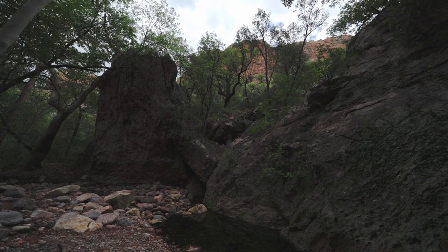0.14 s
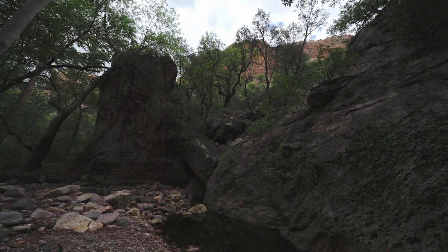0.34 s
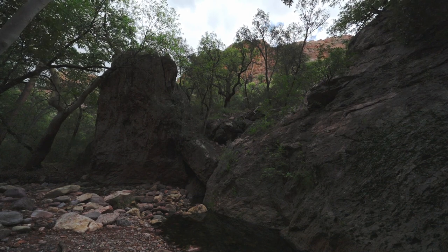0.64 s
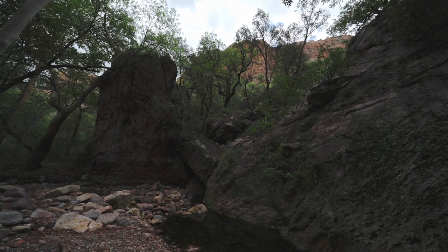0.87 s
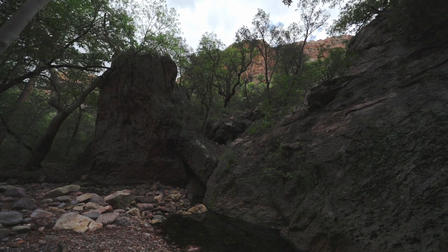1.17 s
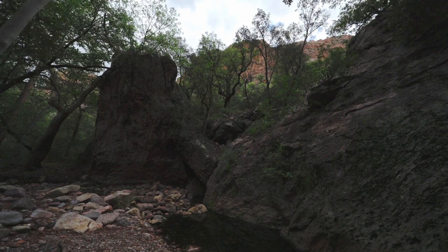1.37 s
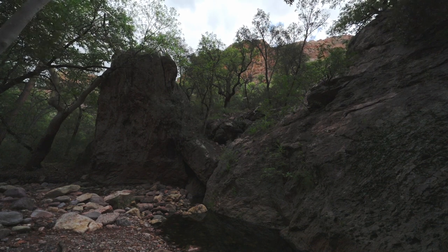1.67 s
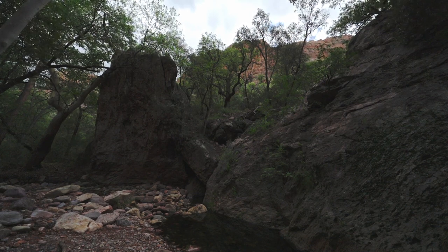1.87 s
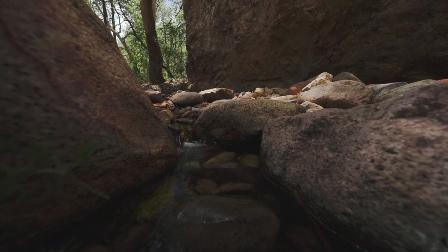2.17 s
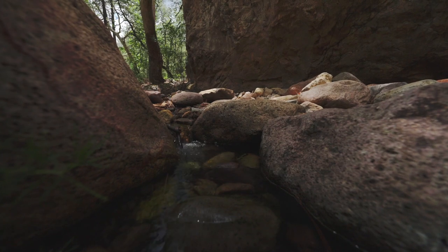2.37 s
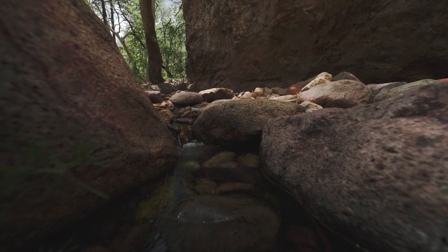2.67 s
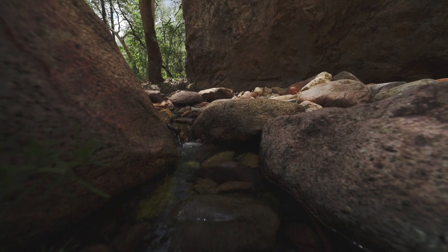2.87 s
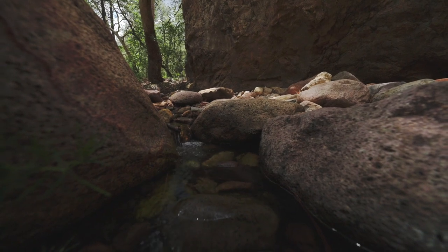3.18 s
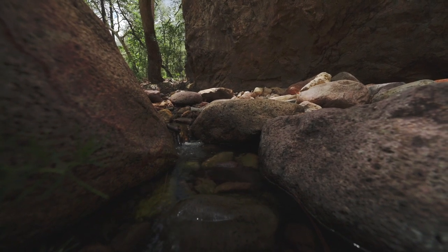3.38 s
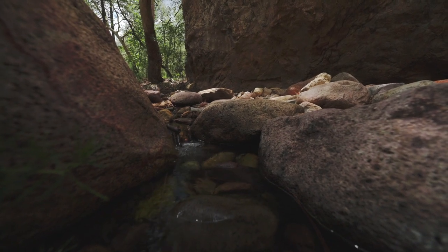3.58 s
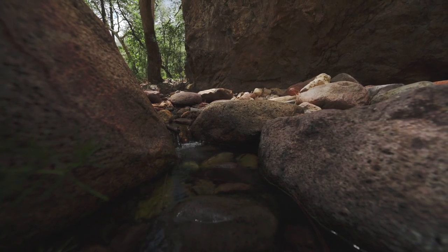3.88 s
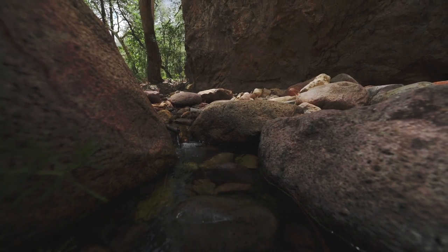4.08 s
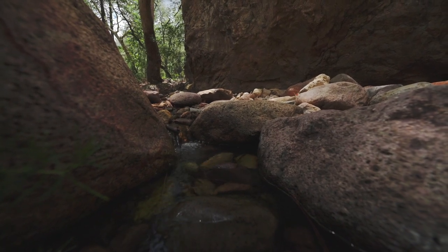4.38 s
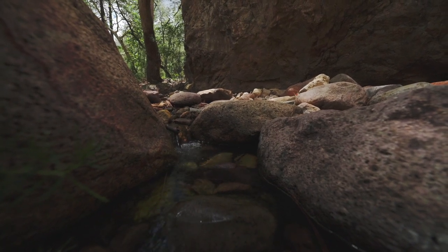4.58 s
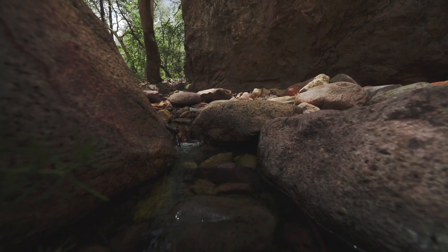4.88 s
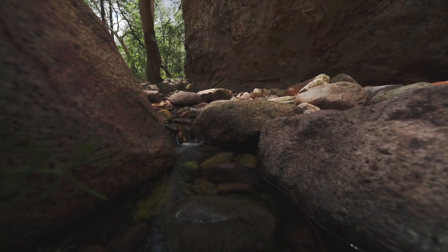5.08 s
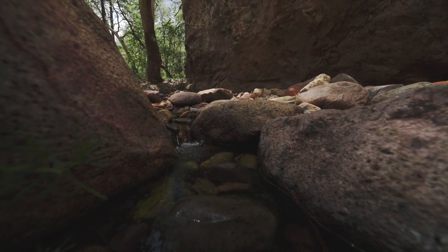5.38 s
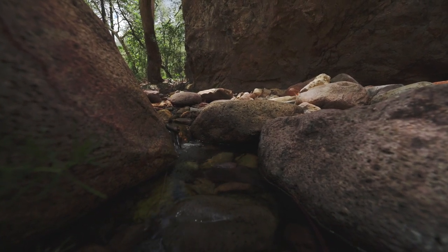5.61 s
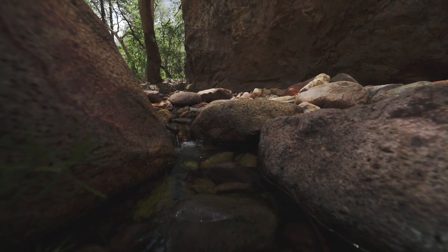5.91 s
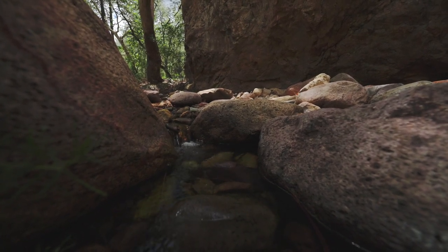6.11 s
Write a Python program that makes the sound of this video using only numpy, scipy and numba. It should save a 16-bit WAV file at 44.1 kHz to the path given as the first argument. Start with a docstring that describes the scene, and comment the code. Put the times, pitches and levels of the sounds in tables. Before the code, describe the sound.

First a quiet, blurred stream heard from afar, with a light low breath of wind and two short stone clacks within the first second. Then, with an abrupt cut and a tiny tap just before it, the microphone is right beside a small spill between rocks. Water bubbles and plops irregularly, bright around the middle pitches, with deeper glugs, crisp droplets and brief falters, closely coloured by the stone cavity.

```python
"""Water spilling into a crevice beside the listener, after a first part in which the creek is far off.
Resonant bubbles, glugging air pockets and bursting droplets ring as decaying sines; spray is enveloped noise.
The cavity between the rocks colours the near water by its resonances, and stone returns dull echoes.
The opening has a few pebble knocks, as struck modes, over the distant creek, as filtered noise with
faint bubbles, and light wind, as low band noise."""
import sys
import numpy as np
from scipy import signal
from scipy.fft import rfft, irfft
from scipy.io import wavfile
from numba import njit

SR = 44100
rng = np.random.default_rng(int(sys.argv[2]) if len(sys.argv) > 2 else 0)


def store_wav(level_fs):
    """Save 16-bit WAV to argv[1]."""
    pcm = np.round(np.clip(np.atleast_2d(level_fs), -1, 1) * 32767)
    wavfile.write(sys.argv[1], SR, pcm.T.astype(np.int16))


N = 275625

NEAR_S = 2.077   # the listening point jumps to the water's edge
CUTOFF_HZ = 15900   # upper limit of the sound

# steady spill at the crevice, between its flurries: (time [s], gurgle level [dB], spray level [dB])
SPILL_FLOW = [(2.08, -36, -47), (2.25, -32.5, -46), (2.45, -32, -45), (2.79, -32.5, -47),
              (3.17, -31.5, -43.5), (3.46, -32.5, -45), (3.59, -32.5, -45.5), (4.04, -32.5, -44.5),
              (4.3, -32.5, -47.5), (4.63, -32.5, -45), (5.13, -32.5, -45), (5.51, -33, -44),
              (5.7, -32.5, -45), (5.84, -31.5, -41.5), (6.07, -31, -44.5), (6.25, -32.5, -41)]
# relative spectrum of the near water: (frequency [Hz], level [dB per Hz])
NEAR_SPECTRUM = [(15, -99), (25, -37), (64, -45.5), (223, -18.5), (714, -4.5), (1020, -6.5), (1610, 2),
                 (4250, -19.5), (4610, -25), (5280, -21), (6560, -38), (9070, -39), (16000, -49)]
# air resonances between the rocks: (frequency [Hz], width [Hz], lift [dB])
CREVICE_RESONANCES = [(233, 70, 11), (464, 153, 9), (734, 124, 5), (1520, 260, 6.5), (2061, 113, 8),
                      (4226, 240, 7.5), (5250, 1300, 4.5), (9300, 4700, 18.5), (13100, 2600, 15.5),
                      (15400, 2000, 16)]
# moments when the spill falters: (middle time [s], length at half depth [s])
LULLS = [(2.445, 0.033), (2.641, 0.035), (2.93, 0.05), (3.459, 0.017), (4.202, 0.027), (4.29, 0.029),
         (4.937, 0.019), (5.1, 0.02), (5.25, 0.032), (5.95, 0.098), (6.06, 0.038)]
LULL_DB = -5   # on the gurgle; the spray takes 0.4 of it
# splashes that build up and break over the whole band: (middle time [s], peak level [dB], length [s])
SPLASHES = [(3.226, -20.5, 0.016), (3.779, -16, 0.015), (6.003, -27, 0.012)]
# brightening of the splashes over the spill: (frequency [Hz], lift [dB])
SPLASH_LIFT = [(300, 12), (2500, 1.5), (6000, 14), (16000, 3)]
# loudest tiny bubbles of the spray: (time [s], peak level [dB], pitch [Hz])
SPRAY_TICKS = [(2.2695, -27, 9900), (2.3105, -30.5, 8790), (2.5743, -28, 9400), (2.7373, -32, 8900),
               (3.2837, -29, 9930), (3.6453, -25, 9860), (3.778, -29, 8740), (4.3174, -31, 8960),
               (4.4086, -28, 13100), (4.5817, -27.5, 9980), (4.8177, -29, 14200), (5.114, -21.5, 9310),
               (5.35, -32, 9470), (5.4915, -26, 9880), (5.6564, -26, 9900)]
# loud bubbles: (time [s], peak level [dB], pitch [Hz], life [cycles])
LOUD_BUBBLES = [(2.084, -22, 1570, 17), (2.123, -16.5, 1520, 15), (2.1398, -17.5, 1520, 26),
                (2.1675, -21, 1580, 26), (2.2225, -20.5, 1470, 15), (2.304, -19, 1600, 10),
                (2.313, -22, 1200, 9.3), (2.3841, -18.5, 1470, 22), (2.411, -21, 1350, 18),
                (2.461, -10, 1535, 24), (2.507, -19, 1380, 26), (2.569, -19, 1320, 8.5),
                (2.7406, -13, 1600, 8.1), (2.958, -16.5, 1390, 140), (2.9902, -17, 1430, 40),
                (3.009, -18, 2070, 18), (3.0103, -12, 1596, 34), (3.077, -18, 1450, 18),
                (3.143, -11, 1700, 7.9), (3.2178, -18.5, 1430, 12), (3.295, -18, 1500, 29),
                (3.318, -17, 1480, 23), (3.343, -13, 1700, 32), (3.404, -15, 1570, 6),
                (3.4725, -15, 1650, 14), (3.478, -14, 2040, 18), (3.504, -17, 1520, 20),
                (3.536, -21, 1550, 17), (3.6768, -16.5, 1590, 35), (3.819, -17, 1660, 10),
                (3.867, -17, 1550, 29), (3.9222, -18, 1580, 28), (4.049, -20, 1520, 23),
                (4.074, -18.5, 1970, 30), (4.1463, -12.5, 1520, 12), (4.2383, -17, 1490, 28),
                (4.31, -23, 1100, 18), (4.3755, -15, 2114, 37), (4.518, -16.5, 1510, 21),
                (4.8146, -23, 1360, 23), (4.8645, -19, 1960, 19), (5.006, -19, 1560, 14),
                (5.018, -25, 1210, 25), (5.041, -11, 1660, 13), (5.112, -18, 1480, 16),
                (5.2042, -19, 1350, 12), (5.2075, -7.5, 1960, 21), (5.2092, -8, 1700, 25),
                (5.23, -17, 2060, 16), (5.244, -16, 1660, 18), (5.319, -16, 1540, 11),
                (5.411, -13.5, 1590, 10), (5.523, -16, 1665, 67), (5.5295, -12.5, 1640, 25),
                (5.5847, -20, 1400, 24), (5.6245, -19, 1600, 22), (5.671, -21, 1600, 23),
                (5.734, -21, 1510, 21), (5.893, -13, 1520, 16), (5.911, -26, 1560, 20),
                (5.967, -26, 2050, 30), (5.991, -27, 1360, 30), (5.9985, -14, 1530, 12),
                (6.025, -18, 2220, 26), (6.0307, -16, 1580, 19), (6.047, -28, 2080, 28),
                (6.237, -14.5, 1510, 11)]
# air pockets closing: (time [s], peak level [dB], pitch [Hz], life [cycles], thump level [dB])
GLUGS = [(2.089, -34, 392, 9.4, -38), (2.139, -32, 670, 53, -50), (2.234, -28, 498, 130, -51),
         (2.288, -23.5, 450, 22, -57), (2.356, -28, 727, 37, -51), (2.421, -29, 770, 16, -62),
         (2.5, -29, 512, 40, -49), (2.54, -31, 705, 25, -58), (2.569, -23.5, 460, 27, -54),
         (2.664, -31, 497, 20, -44), (2.697, -25, 510, 52, -55), (2.739, -25, 590, 30, -49),
         (2.74, -28, 405, 43, -55), (2.84, -27, 640, 20, -54), (2.982, -31, 725, 28, -61),
         (3.143, -28, 488, 35, -53), (3.2258, -21.5, 475, 26, -43), (3.416, -20, 720, 25, -59),
         (3.63, -22, 486, 15, -36), (3.683, -28.5, 420, 25, -56), (3.7757, -24.5, 498, 51, -46),
         (4.143, -46, 678, 28, -44), (4.24, -21.5, 754, 31, -67), (4.318, -31, 468, 29, -42.5),
         (4.445, -23.5, 480, 25, -43.5), (4.813, -26, 503, 25, -43.5), (4.884, -24, 746, 21, -45.5),
         (5.012, -32.5, 670, 34, -58), (5.045, -28, 648, 36, -41), (5.207, -29, 688, 34, -48),
         (5.394, -23, 722, 30, -49), (5.504, -30.5, 764, 49, -43), (5.565, -20.5, 707, 8.1, -48),
         (5.67, -24, 720, 19, -47), (5.754, -21, 706, 20, -45), (5.894, -25.5, 415, 18, -39.5),
         (5.998, -21, 715, 17, -35), (6.122, -26, 474, 17, -39), (6.186, -34, 674, 11, -46),
         (6.237, -24, 716, 29, -43)]
# droplets bursting: (time [s], peak level [dB], pitch [Hz])
DROPLETS = [(2.1316, -28, 5250), (3.015, -26, 2880), (3.2223, -27.5, 3670), (3.479, -26.5, 3260),
            (3.5137, -25.5, 2770), (3.7785, -22, 5100), (4.0434, -26.5, 3820), (4.151, -29, 3050),
            (4.2407, -26.5, 5200), (4.3362, -27, 2930), (4.578, -27, 5300), (4.896, -22.5, 4160),
            (5.1139, -25, 5600), (5.208, -25, 5250), (5.785, -28.5, 3530)]
# modes of the air under the rocks: (frequency [Hz], level against the thump [dB], 60 dB decay time [s])
HOLLOW_MODES = [(237.6, 7.5, 0.07), (325, 7, 0.041), (700, -1, 0.13)]
HOLLOW_SPREAD = 0.083   # log pitch spread: the water level shifts it from glug to glug
# echoes off the near rocks: (delay [s], level [dB])
ROCK_ECHOES = [(.0031, -11.5), (0.009, -16)]
FLURRY_RISE_S, FLURRY_FALL_S = 0.0012, 0.016   # power rise and amplitude fall time constants
GURGLE_FLURRY_DB, SPRAY_FLURRY_DB = -23, -14   # flurry level against the peak of its burst
POP_DB, POP_MS = -16, 0.78   # birth pop: strike level against the bubble's peak; decay time
SPATTER_SWELL = 0.85   # swell time of a puff of spray over its decay time
MIST_DB, RUMBLE_DB = -60.5, -70.5   # rms levels
# pebble knocks: (time [s], peak level [dB], lift above 2800 Hz [dB], pitch ratio of the 1200-2800 Hz modes,
# contact length [ms], snap level [dB], lift below 1200 Hz [dB], share of the ring time)
PEBBLE_KNOCKS = [(.349, -18, 4.5, 0.87, 4.4, -23, -4, 1), (0.557, -7.5, 3, 0.95, 4.2, -13, -2.5, 0.67),
                 (2.046, -25.5, -20, 1, 1.5, -33, 5, 0.32)]
# modes of the pebble: (frequency [Hz], level against the knock [dB], 60 dB decay time [s])
PEBBLE_MODES = [(570, -7, 0.018), (954, -6.5, 0.017), (1888, 1, 0.026), (2270, -17.5, 0.094),
                (3240, -18.5, 0.018), (3780, -17, 0.013), (4560, -22.5, 0.0053), (8560, -43, 0.0022),
                (12400, -31, 0.0039)]
# colour of the contact snap: (frequency [Hz], level [dB per Hz])
SNAP_SPECTRUM = [(400, -0.5), (2000, 3), (5300, -6.5), (6700, -13), (9500, -18), (16000, -22)]
SNAP_PEAK_MS = 1.7   # time at which the envelope of the dry snap peaks
# echoes of the knocks off the ground: (delay [s], level [dB])
GROUND_ECHOES = [(.0105, -10.5), (.0145, -18), (.021, -27), (.052, -32)]
# distant creek: (time [s], water level [dB], wind level [dB])
FAR_LEVELS = [(0, -45, -75), (.3, -47, -69), (.45, -45.5, -59), (.6, -45.5, -66), (.8, -46, -64),
              (.86, -45, -56), (1.0, -45.5, -63), (1.25, -46, -59.5), (1.45, -45.5, -64), (1.75, -44, -57),
              (1.93, -45.5, -53), (2.07, -43.5, -71)]
# relative spectrum of the distant water: (frequency [Hz], level [dB per Hz])
FAR_SPECTRUM = [(53, -40), (90, -9), (180, -6.5), (480, 1), (650, 1), (1000, -3.5), (1900, -6), (3000, -9),
                (4300, -8.5), (5300, -9.5), (6700, -26.5), (9500, -19), (11500, -30), (16000, -30)]
# faint bubbles that carry from afar: (time [s], peak level [dB], pitch [Hz])
FAR_PLOPS = [(0.688, -34.5, 1720), (0.753, -38, 1090), (1.393, -36, 1960), (1.448, -36.5, 1790),
             (1.483, -36, 1870), (1.587, -39, 1800), (1.7562, -38, 1890)]


def near_spill():
    """Superposition of bubble swarms and spray, whose surges share one slow modulation."""
    gurgle_db, spray_db = in_time(SPILL_FLOW)
    lull_db = LULL_DB * sum(bump(s, 2 * length_s) for s, length_s in LULLS)
    gurgle_db, spray_db = gurgle_db + lull_db, spray_db + 0.4 * lull_db
    surge = drift(20.0)
    hiss = rng.standard_normal(N) * from_db(1.84 * surge)
    puffs = spray_puffs(surge)

    bubbles = swarm(1400, 147.5, 4213, cycles=18.0, spread_db=3.0, clumps_db=2.2 * surge)
    small_bubbles = swarm(1200, 2433, 9900, cycles=35.0, spread_db=5.5, clumps_db=3.0 * surge)
    fizz = swarm(700, 6200, CUTOFF_HZ, cycles=26.0, spread_db=4.5, clumps_db=3.0 * surge)
    gurgle = bubbles + from_db(2.5) * hiss + from_db(-1.5) * puffs
    splash = small_bubbles + from_db(4.0) * hiss + from_db(3.0) * puffs
    spray = puffs + from_db(-6.0) * fizz

    # each layer keeps its own band of the shared colour
    gurgle = rms_one(band(in_crevice(gurgle), 3, 3200, "low"))
    splash = rms_one(band(in_crevice(splash), 3, [3200, 6600], "band"))
    spray = rms_one(band(in_crevice(spray), 3, 6600, "high"))

    # steady flow and flurries add as powers
    gurgle_gain = np.sqrt(from_db(2 * gurgle_db) + flurries([LOUD_BUBBLES, GLUGS], GURGLE_FLURRY_DB))
    spray_gain = np.sqrt(from_db(2 * spray_db) + flurries([DROPLETS, SPRAY_TICKS], SPRAY_FLURRY_DB))
    ticks = named_bubbles(*np.transpose(SPRAY_TICKS), cycles=21.0, rise=.05, swell=1.8)
    water = gurgle_gain * gurgle + spray_gain * (splash + from_db(-8.0) * spray)
    return water + ticks + splashes() + mist() + rumble()


def spray_puffs(surge):
    """Random impacts: strikes of uneven strength, denser as the flow surges."""
    rate_per_s = 260 * from_db(2.0 * surge + 1.5 * drift(30.0))
    struck = rng.random(N) < rate_per_s / SR
    strength_db = 7.0 * np.minimum(rng.exponential(1, N), 3)
    return rms_one(spatter(struck * from_db(strength_db), decay_ms=2.7))


def in_crevice(x):
    """Cavity resonance: the air between the rocks lifts parts of the water's spectrum."""
    return colour(x, NEAR_SPECTRUM, CREVICE_RESONANCES)


def splashes():
    """Amplitude modulation: smooth swells of broadband noise in a brightened crevice colour."""
    noise = rms_one(colour(in_crevice(rng.standard_normal(N)), SPLASH_LIFT))
    swells = sum(from_db(peak_db) * bump(s, length_s) for s, peak_db, length_s in SPLASHES)
    return noise / 2 * swells   # a peak is taken as twice the rms


def flurries(tables, level_db):
    """Energy addition: the power of the churn stirred up by each burst rises fast and falls slower."""
    power = sum(clicks(rows[0], 2 * (rows[1] + level_db)) for rows in map(np.transpose, tables))
    t = np.arange(SR // 4) / SR
    shape = np.exp(-2 * t / FLURRY_FALL_S) * (1 - np.exp(-t / FLURRY_RISE_S))
    return np.abs(signal.oaconvolve(power, shape / shape.max())[:N])


def bursts():
    """Bubble resonance: the loudest bubbles, glugs and droplets ring, pop, thump and echo off the rocks."""
    bubbles = named_bubbles(*np.transpose(LOUD_BUBBLES), rise=-0.0021, swell=1.35)
    s, peak_db, hz, cycles, _ = np.transpose(GLUGS)
    glugs = named_bubbles(s, peak_db, hz, cycles, rise=0.019, swell=1.0)
    droplets = named_bubbles(*np.transpose(DROPLETS), cycles=43.0, rise=0.13, swell=1.6)
    out = bubbles + glugs + droplets + hollow_thumps() + birth_pops()
    # a high-pass keeps the bursts free of deep bass
    return echoes(band(out, 4, 150, "high"), ROCK_ECHOES, dull_hz=4240)


def hollow_thumps():
    """Cavity excitation: each closing pocket sets the air modes under the rocks ringing."""
    s, _, _, _, thump_db = np.transpose(GLUGS)
    shift = np.exp(HOLLOW_SPREAD * rng.standard_normal(len(s)))
    return sum(named_bubbles(s, thump_db + level_db, mode_hz * shift, mode_hz * t60, 0, swell=0.26)
               for mode_hz, level_db, t60 in HOLLOW_MODES)


def birth_pops():
    """Impulsive excitation: a puff of noise at each loud bubble's birth is coloured by the crevice."""
    s, peak_db, *_ = np.transpose(LOUD_BUBBLES)
    response = in_crevice(np.eye(1, 4000)[0])
    pops = spatter(clicks(s, peak_db + POP_DB), POP_MS)
    return signal.oaconvolve(pops, response / np.linalg.norm(response))[:N]


def named_bubbles(s, peak_db, hz, cycles, rise, swell):
    """Damped oscillation: bubbles at given moments, scaled so that the swell tops out at the peak level."""
    at, same = (s * SR).astype(np.int64), np.ones(len(s))
    ratio = swell * np.log(1000) / cycles   # swell time over decay time
    top = (1 + 1 / ratio) ** -ratio / (1 + ratio)
    size = from_db(peak_db) / top * same
    return add_bubbles(np.zeros(N), at, size, hz / SR * same, cycles * same, rise * same, swell)


def swarm(per_s, low_hz, high_hz, cycles, spread_db, clumps_db, near=True):
    """Random superposition: clumped bubbles, with small ones scaled up so that the spectrum is flat."""
    at = np.flatnonzero(rng.random(N) < per_s * from_db(clumps_db) / SR)
    at = at[(at >= NEAR_S * SR) == near]
    draw = rng.random((len(at), 4))
    hz = low_hz * (high_hz / low_hz) ** draw[:, 0]
    strength_db = spread_db * np.minimum(-np.log(1 - draw[:, 1]), 3.0)
    size = hz * from_db(strength_db) * np.sign(draw[:, 2] - .5)
    life = cycles * (.5 + draw[:, 3])
    return rms_one(add_bubbles(np.zeros(N), at, size, hz / SR, life, 0.13 * draw[:, 3], 3.0))


@njit
def add_bubbles(out, at, size, step, cycles, rise, swell):
    """Damped oscillation: a sine swells within cycles, decays 60 dB over its life and may slide in pitch."""
    for k in range(len(at)):
        phase, dying, unborn = 0.0, size[k], 1.0
        life = cycles[k] / step[k]   # in samples
        loss, growth = 0.001 ** (1 / life), np.exp(-step[k] / swell)
        for i in range(min(int(life), len(out) - at[k])):
            phase += step[k] * (1 + rise[k] * i / life)
            out[at[k] + i] += dying * (1 - unborn) * np.sin(2 * np.pi * phase)
            dying, unborn = dying * loss, unborn * growth
    return out


def spatter(strikes, decay_ms):
    """Impact noise: each strike is a puff that swells briefly and decays exponentially."""
    r = np.exp(-1000 / (decay_ms * SR))
    swell = np.hanning(max(3, round(SPATTER_SWELL * decay_ms * SR / 1000)))
    decays = signal.lfilter([1], [1, -r], strikes + 1e-18)
    return np.convolve(decays, swell / swell.sum())[:N] * rng.standard_normal(N)


def knocks():
    """Modal excitation: a short rough contact snaps and builds up the pebble's modes."""
    out = np.zeros(N)
    for s, peak_db, bright_db, pitch, contact_ms, snap_db, body_db, damped in PEBBLE_KNOCKS:
        at, size = round(s * SR), round(contact_ms * SR / 1000)
        snap = contact_snap()
        out[at:at + len(snap)] += from_db(snap_db) * snap
        for hz, level_db, t60 in PEBBLE_MODES:
            mode_hz = hz * pitch if 1200 < hz < 2800 else hz
            in_step = np.cos(2 * np.pi * (mode_hz * np.arange(size) / SR + rng.random()))
            touch = (in_step + 0.98 * rng.standard_normal(600)[:size]) * np.hanning(size)
            sound = ring(np.pad(touch, (0, 6000)), mode_hz, t60 * damped)
            strength_db = peak_db + level_db + bright_db * (hz > 2800) + body_db * (hz < 1200)
            out[at:at + len(sound)] += from_db(strength_db) * sound / np.max(np.abs(sound))
    # a gentle high-pass thins the bass of the knocks
    out = band(out + 1e-18 * rng.standard_normal(N), 2, 330, "high")
    return echoes(out, GROUND_ECHOES, dull_hz=1510)


def contact_snap():
    """Contact noise: coloured noise under an envelope that rises linearly and decays exponentially."""
    t = np.arange(1000) / SR * 1000 / SNAP_PEAK_MS
    noise = colour(rng.standard_normal(len(t)), SNAP_SPECTRUM)[:len(t)]
    return t * np.exp(1 - t) * noise


def ring(force, hz, t60):
    """Modal resonance: a unit click sets a decaying sine of initial height 1 ringing."""
    r, w = from_db(-60 / (t60 * SR)), 2 * np.pi * hz / SR
    return signal.lfilter([0, np.sin(w)], [1, -2 * r * np.cos(w), r * r], force + 1e-18)


def echoes(x, table, dull_hz):
    """Reflection: delayed copies, dulled by a two-pole low-pass, join the direct sound."""
    r = np.exp(-2 * np.pi * dull_hz / SR)
    dull = signal.lfilter([1], [1, -2 * r, r * r], x + 1e-18) * (1 - r) ** 2
    out = x.copy()
    for delay_s, level_db in table:
        lag = round(delay_s * SR)
        out[lag:] += from_db(level_db) * dull[:-lag]
    return out


def far_creek():
    """Blurring by distance: many bubbles merge into a soft rush, with faint plops and wind."""
    water_db, wind_db = in_time(FAR_LEVELS)
    patter = swarm(990, 243, 9430, cycles=17.0, spread_db=6.0, clumps_db=5.4 * drift(11.0), near=False)
    rush = rng.standard_normal(N) + from_db(-17.5) * patter
    water = rms_one(colour(rush, FAR_SPECTRUM))
    return from_db(water_db) * water + far_plops() + from_db(wind_db) * wind()


def far_plops():
    """Multipath propagation: close dull echoes smear the faint bubbles on the way."""
    plops = named_bubbles(*np.transpose(FAR_PLOPS), cycles=25.0, rise=.1, swell=0.51)
    return echoes(plops, [(.004, -10), (.009, -5), (.016, -6)], dull_hz=5000)   # (delay [s], level [dB])


def wind():
    """Turbulence noise: a low band of noise, buffeting by slow random gain."""
    return rms_one(band(rng.standard_normal(N), 3, [16, 75], "band")) * from_db(2.0 * drift(14.0))


def mist():
    """Stationary noise: a steady high hiss in the crevice's colour."""
    return from_db(MIST_DB) * rms_one(band(in_crevice(rng.standard_normal(N)), 3, 6000, "high"))


def rumble():
    """Stationary noise: the gorge's steady low band."""
    return from_db(RUMBLE_DB) * rms_one(band(rng.standard_normal(N), 2, [75, 170], "band"))


def colour(x, spectrum, peaks=()):
    """Minimum-phase filtering: a causal response from a spectrum and resonance lifts, by the cepstrum."""
    size = 2 ** 13
    hz = np.maximum(np.arange(size // 2 + 1) * SR / size, 10)
    point_hz, point_db = np.transpose(spectrum)
    level_db = np.interp(np.log(hz), np.log(point_hz), point_db)
    for centre_hz, width_hz, lift_db in peaks:
        level_db = level_db + lift_db / (1 + (2 * (hz - centre_hz) / width_hz) ** 2)
    cepstrum = irfft(np.log(from_db(level_db)))
    cepstrum[1:size // 2] *= 2
    cepstrum[size // 2 + 1:] = 0
    return signal.oaconvolve(x, irfft(np.exp(rfft(cepstrum))))[:N]


def band(x, order, edge_hz, kind):
    """Band limitation: a Butterworth filter."""
    return signal.sosfilt(signal.butter(order, edge_hz, kind, fs=SR, output="sos"), x)


def drift(rate_hz):
    """Slow random modulation: noise at every 40th sample, twice through a one-pole low-pass; rms 1."""
    r = np.exp(-80 * np.pi * rate_hz / SR)
    noise = rng.standard_normal(N // 40 + 1002)
    slow = signal.lfilter([1], [1, -2 * r, r * r], noise)[1000:]   # skip the settling
    return np.interp(np.arange(N) / 40, np.arange(len(slow)), rms_one(slow))


def bump(middle_s, length_s):
    """Raised-cosine envelope: a smooth swell from 0 to 1 and back."""
    return np.cos(np.pi * np.clip((np.arange(N) / SR - middle_s) / length_s, -.5, .5)) ** 2


def clicks(s, level_db):
    """Unit impulses, scaled, at given moments."""
    out = np.zeros(N)
    out[(s * SR).astype(int)] = from_db(level_db)
    return out


def in_time(rows):
    """Linear interpolation: each curve column becomes one value a sample."""
    s, *columns = np.transpose(rows)
    return [np.interp(np.arange(N) / SR, s, c) for c in columns]


def rms_one(x):
    """Power normalisation to rms 1."""
    return x / np.sqrt(np.mean(x ** 2) + 1e-20)


def from_db(db):
    """Logarithmic level: decibels to amplitude gain."""
    return 10 ** (np.asarray(db) / 20)


def scene():
    """Superposition: the far creek gives way to the near spill, with the knocks and bursts added."""
    near = np.arange(N) >= NEAR_S * SR
    return (np.where(near, near_spill(), far_creek()) + bursts() + knocks())[None]


def record(dry):
    """Band limitation: a steep elliptic low-pass cuts the top."""
    return signal.sosfilt(signal.ellip(12, .5, 60, CUTOFF_HZ, fs=SR, output="sos"), dry)


dry = scene()
out = record(dry)
store_wav(out)
```